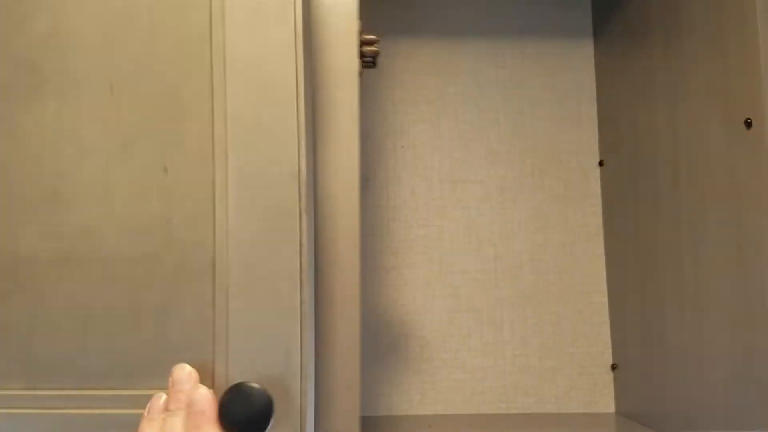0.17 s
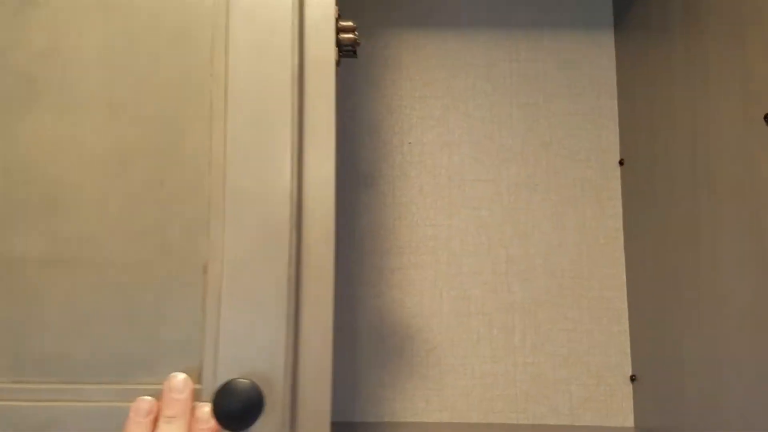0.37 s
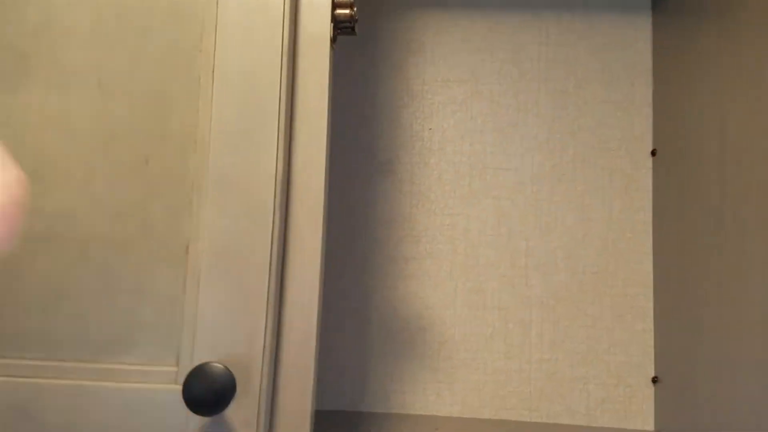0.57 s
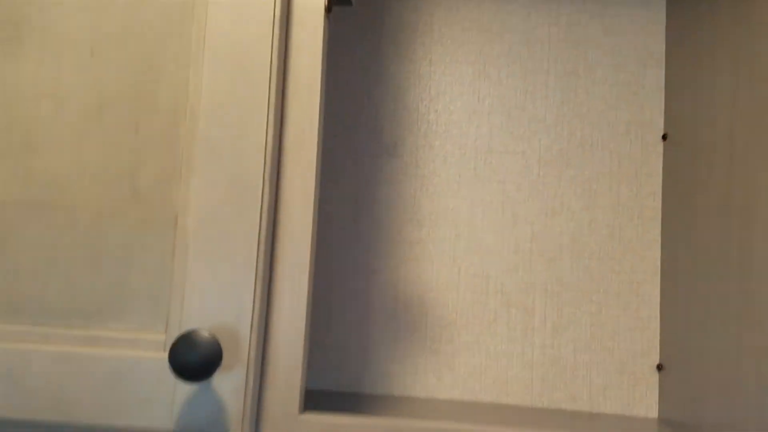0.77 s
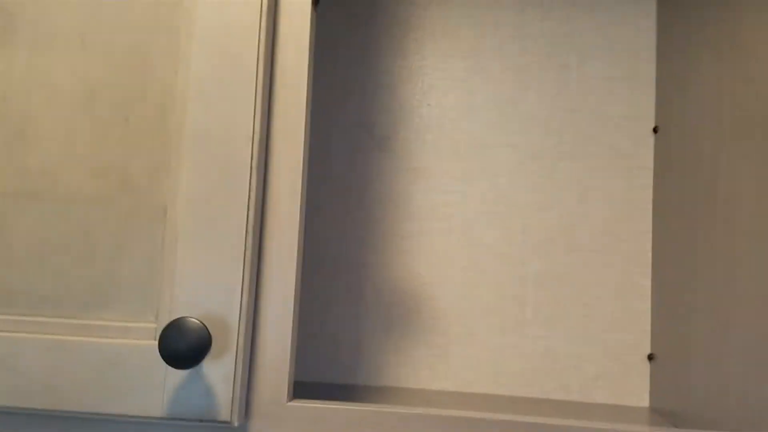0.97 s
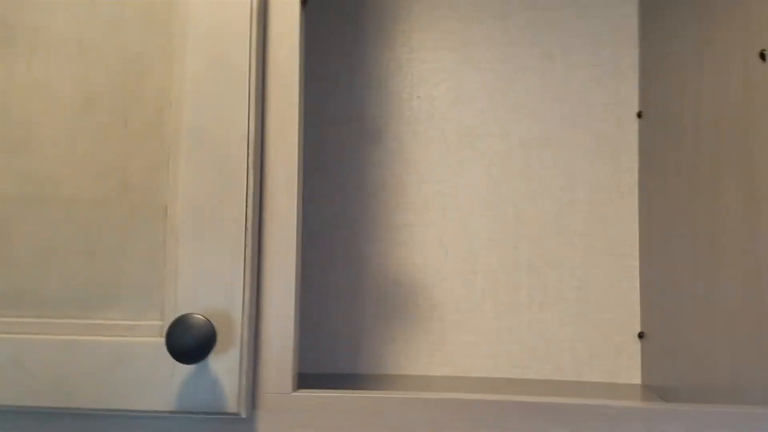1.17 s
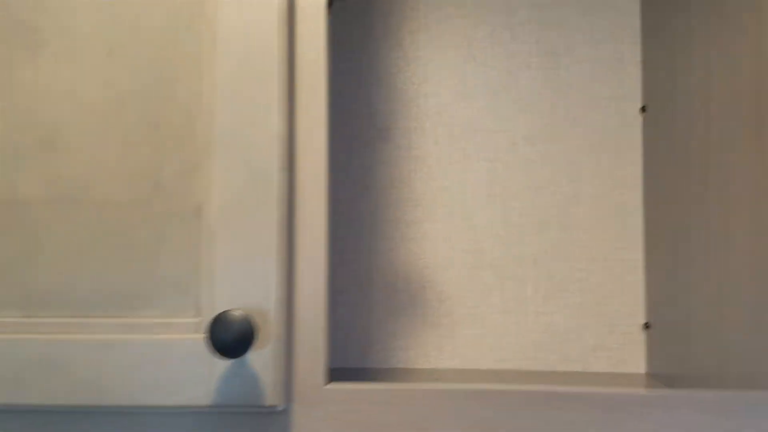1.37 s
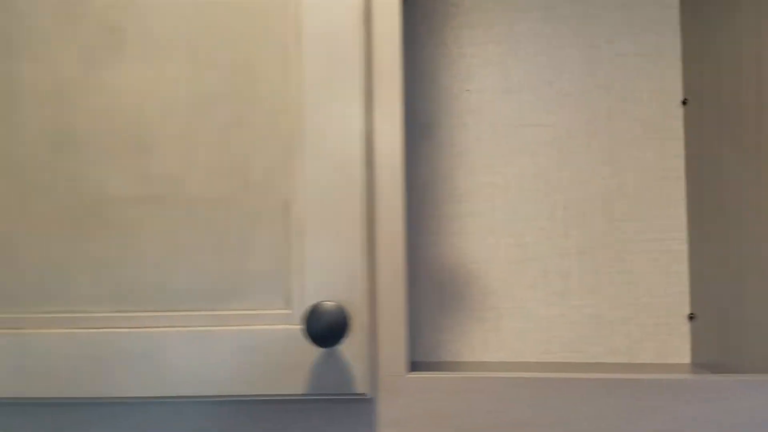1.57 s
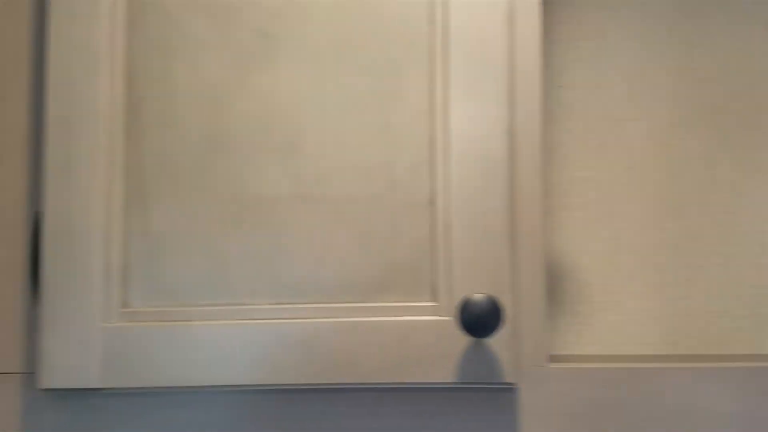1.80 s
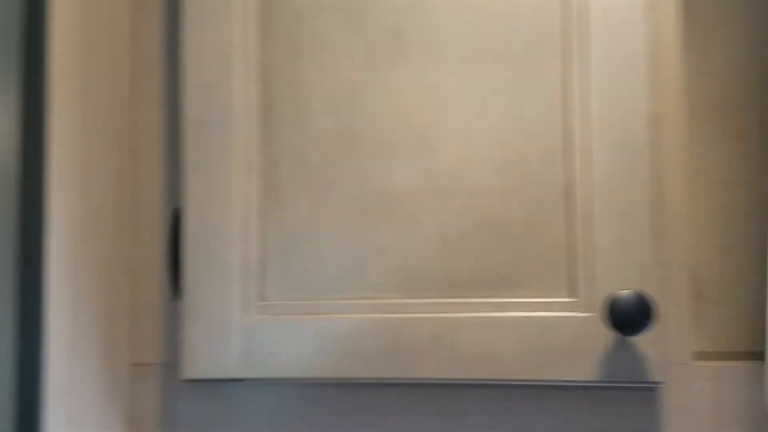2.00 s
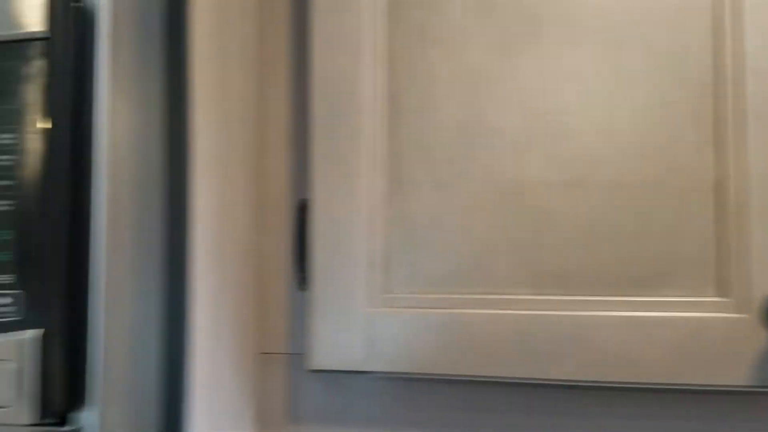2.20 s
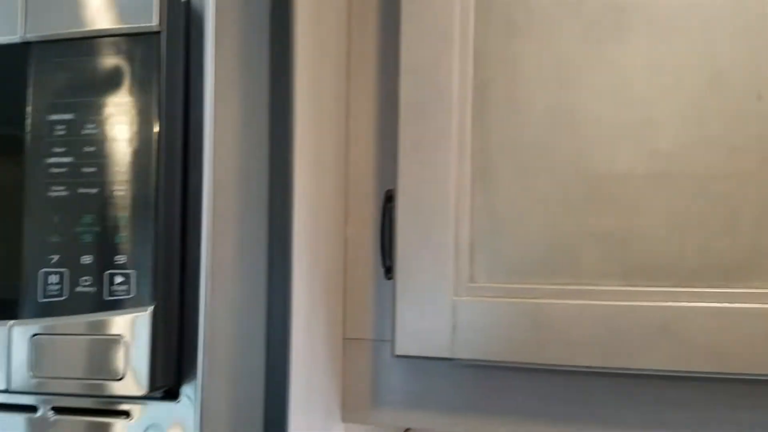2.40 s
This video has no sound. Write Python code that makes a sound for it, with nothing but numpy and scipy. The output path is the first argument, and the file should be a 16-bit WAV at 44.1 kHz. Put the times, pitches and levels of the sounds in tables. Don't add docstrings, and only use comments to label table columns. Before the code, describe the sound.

A cupboard door bangs shut with a quick rattling bounce, handling clicks and rubs follow close to the stereo phone microphone, then a second door clacks closed with more catch and room tail over faint cabin hum.

```python
import sys
import numpy as np
from scipy import signal
from scipy.fft import rfft, irfft, next_fast_len
from scipy.io import wavfile
from scipy.ndimage import uniform_filter1d

SR = 44100
rng = np.random.default_rng(int(sys.argv[2]) if len(sys.argv) > 2 else 0)


def wrap_up_sound(samples):
    columns = np.atleast_2d(samples).T
    tamed = np.clip(columns, -1, 1)
    steps = np.round(tamed * 32767).astype(np.int16)
    wavfile.write(sys.argv[1], SR, steps)


def gain_from_db(level_db):
    decades = np.asarray(level_db, float) / 20
    return 10 ** decades


N = 108045

# frequency in Hz, likeness from 0 to 1.
DOOR_LIKENESS = [(60, 1), (250, 0.97), (700, 0.8), (2000, 0.58), (12000, 0.22)]


def evened(x):
    return x / np.sqrt(np.mean(x ** 2) + 1e-20)


def read(points, hz):
    f, value = np.transpose(points)
    return np.interp(np.log(hz + 1), np.log(f + 1), value)


def add(mix, s, sound):
    part = mix[..., round(s * SR):][..., :sound.shape[-1]]
    part += sound[..., :part.shape[-1]]


def coloured(x, gain):
    size = next_fast_len(x.shape[-1] + 2048)
    spectrum = rfft(x, size) * gain(np.fft.rfftfreq(size, 1 / SR))
    return irfft(spectrum, size)[..., :x.shape[-1]]


def resonance(hz, centre_hz, width_hz):
    return 1 / (1 + (2 * (hz - centre_hz) / width_hz) ** 2)


def slow_drift(rows, size):
    noise = uniform_filter1d(rng.standard_normal((rows, N)), size=size)
    return evened(uniform_filter1d(noise, size=size))


def panned(db, pan_db):
    return gain_from_db(db + np.array([[pan_db / 2], [-pan_db / 2]]))


def advanced(x, lag_ms):
    return coloured(x, lambda hz: np.exp(2j * np.pi * hz * lag_ms / 1000))


def earlier(pair, lag_ms):
    return np.array([pair[0], advanced(pair[1], lag_ms)])


def hum():
    # frequency in Hz, level in dB per Hz.
    floor = [(25, 1.5), (80, -1.5), (125, -13), (250, -11), (340, -6.5), (2200, -19.5), (4500, -30.5),
             (8000, -47.5)]
    # frequency in Hz, width in Hz, lift in dB.
    bands = [(350, 99, 3.5), (895, 250, 4.5), (1362, 235, 5.5), (1900, 440, 4)]
    # frequency in Hz, likeness of the two ports from 0 to 1.
    likeness = [(60, 0.74), (240, 1), (900, 0.15), (4000, 0.13)]
    # time in seconds, level in dB.
    swells = [(0, 2), (.4, 2), (0.651, -3), (.9, 1), (1.33, -2.5), (2.45, -0.5)]
    level_db, lag_ms = -48, 0.4

    frames, hz = N // 256 + 5, np.fft.rfftfreq(2048, 1 / SR)
    a, b, c, d, patches = rng.standard_normal((frames, len(hz), 5)).T
    patches = uniform_filter1d(patches, size=8, axis=0)
    patches = evened(uniform_filter1d(patches, size=14, axis=1))
    lift = sum(db / (1 + (2 * (hz - f) / w) ** 4) for f, w, db in bands)[:, None]
    same = np.clip(read(likeness, hz), -1, 1)[:, None]
    left = a + 1j * b
    right = same * left + np.sqrt(1 - same ** 2) * (c + 1j * d)
    colour = gain_from_db(read(floor, hz)[:, None] + lift + (1.2 + .25 * lift) * patches)
    spectrum = np.array([left, right]) * colour
    x = evened(signal.istft(spectrum, nperseg=2048, noverlap=2048 - 256)[1][:, :N])
    x = x * gain_from_db(level_db + np.interp(np.arange(N) / SR, *np.transpose(swells)))
    return earlier(x, lag_ms)


def drone():
    motor_hz, wander_hz, level_db, swing_db = 79.1, 3.2, -57.5, 2.2
    swing, wander = slow_drift(2, 3000)
    phase = 2 * np.pi * np.cumsum(motor_hz + wander_hz * wander) / SR
    return gain_from_db(level_db + swing_db * swing) * np.sqrt(2) * np.sin(phase)


def ticks():
    # time in seconds, peak in dB, ring in Hz, pan in dB, dry snap in dB.
    taps = [(.062, -35, 2300, 4, -32), (.972, -48, 4000, -10, -25), (.976, -50, 5800, -10, -25),
            (1.049, -36, 2300, -10, -24), (1.892, -47, 4000, 6, -8), (0.777, -34, 3850, 23, -15.5),
            (.851, -26.5, 1110, 10, -19), (0.997, -37.5, 2650, -14, -9), (1.012, -37.5, 2920, -17, -2.5),
            (1.022, -23.5, 1300, 3, -26), (1.028, -36, 2400, -28, -24), (1.032, -31, 910, -10, -9),
            (1.036, -33, 2630, -1, -18), (1.042, -23, 2950, -9, -18), (1.055, -20, 2300, -15.5, -15.5),
            (1.232, -35.5, 920, -4, -30), (1.074, -53, 9000, -12, -4), (1.983, -25.5, 1340, -9, -21),
            (2.049, -36.5, 2980, 26.5, -20)]
    cycles, snap_t60_s = 1.55, .003
    out, t = np.zeros((2, N)), np.arange(400) / SR
    for s, db, hz, pan, snap_db in taps:
        u = t * hz / cycles
        tick = np.e * 3 * u * np.exp(-3 * u) * np.sin(2 * np.pi * hz * t)
        snap = gain_from_db(snap_db - 60 * t / snap_t60_s) * rng.standard_normal((2, 400))
        add(out, s - .0005, panned(db, pan) * (tick + snap))
    return out


def stroke(length, hz, octaves, top_hz):
    rise, grit_db = 0.13, 1.5
    u = np.arange(9000) / SR / length
    grit = rng.standard_normal((3, 9000)) * gain_from_db(grit_db * np.minimum(rng.exponential(1, 9000), 4))

    def band(f):
        return np.exp(-.5 * (np.log2((f + 1) / hz) / octaves) ** 2) / (1 + (f / top_hz) ** 6)

    grit = evened(coloured(grit[:2] + grit[2], band))
    return grit * np.minimum(u / rise, 1) * np.exp(-3.5 * np.maximum(u - rise, 0) ** 1.3)


def rubs():
    # start in seconds, length in seconds, level in dB, centre in Hz, pan in dB.
    slides = [
        (0.773, 0.1, -50.5, 3200, 24.5),
        (0.848, 0.025, -50.5, 2920, 25),
        (0.963, 0.093, -62, 2960, 18),
        (1.013, 0.037, -43.5, 1120, 17),
        (1.224, 0.085, -46, 455, 7),
        (1.912, 0.05, -45.5, 610, 5),
        (1.979, 0.069, -35.5, 626, 5.5),
        (2.017, 0.16, -44.5, 1070, 2),
        (.062, 0.048, -44.5, 830, -2),
    ]
    rustles = [
        (1.531, .04, -47, 1500, 7),
        (1.546, .08, -46, 2600, 3),
        (1.548, .018, -59, 11000, 0),
        (.778, .06, -63, 11500, 15),
        (1.735, .03, -61, 3500, 0),
    ]
    out = np.zeros((2, N))
    for s, length, db, hz, pan in slides:
        add(out, s, panned(db, pan) * stroke(length, hz, 1.23, 7540))
    for s, length, db, hz, pan in rustles:
        add(out, s, panned(db + 1.1, pan) * stroke(length, hz, 0.63, SR))
    return out


def bumps():
    # time in seconds, level in dB, frequency in Hz, swell in seconds.
    pushes = [(.728, -34.5, 81, 0.0072), (1.045, -40.5, 150, 0.0074), (1.256, -45, 166, 0.0079),
              (2.04, -39.5, 243, 0.0055), (0.062, -28, 70.4, 0.0071), (0.778, -28.5, 66, 0.0087),
              (1.2, -40.5, 72.4, 0.04), (1.229, -36.5, 340, 0.0031), (1.434, -34, 144, 0.025),
              (1.44, -42, 305, 0.0097), (1.982, -29, 427, 0.0019), (1.978, -34.5, 67, 0.0065),
              (2.018, -31, 60, .02)]
    out, t = np.zeros((2, N)), np.arange(9000) / SR
    for s, db, hz, swell in pushes:
        envelope = (t / swell * np.exp(1 - t / swell)) ** 2
        add(out, s, -gain_from_db(db) * envelope * np.sin(2 * np.pi * hz * t))
    return out


def hand():
    return earlier(ticks() + rubs() + bumps(), 0.408)


def hinge():
    # start in seconds, length in seconds, level in dB, frequency in Hz, width in Hz.
    whines = [
        (.07, .12, -47, 1346, 290),
        (.42, .14, -57, 1420, 220),
        (.89, .05, -55, 1360, 120),
        (1.63, .07, -54, 1350, 100),
        (1.72, .12, -53, 1370, 130),
        (1.57, .06, -54, 370, 60),
        (1.76, .1, -57, 560, 80),
        (2.24, .1, -52, 1400, 700),
    ]
    out = np.zeros((2, N))
    for s, length, db, centre_hz, width_hz in whines:
        grit = rng.standard_normal((2, 9000)) * rng.exponential(1, 9000)
        whine = evened(coloured(grit + grit[0], lambda hz: resonance(hz, centre_hz, width_hz)))
        arch = np.sin(np.pi * np.clip(np.arange(9000) / SR / length, 0, 1))
        add(out, s, gain_from_db(db - 0.7) * np.sqrt(arch.clip(0)) * whine)
    return out


def ports(one, other, lag_ms, lean_db):
    def like(hz):
        return np.clip(read(DOOR_LIKENESS, hz), 0, 1)

    shared = advanced(coloured(one, like), lag_ms)
    right = shared + coloured(other, lambda hz: np.sqrt(1 - like(hz) ** 2))
    return np.array([one * gain_from_db(lean_db / 2), right * gain_from_db(-lean_db / 2)])


def ring(modes, length, s):
    rise_s, scatter_rad, scatter_db = .0008, 1.4, 2.85
    t = np.arange(round(length * SR)) / SR
    luck = rng.uniform(-0.93, 1, (len(modes), 2))
    out = np.zeros(len(t))
    for (u, v), (hz, db, t60) in zip(luck, modes):
        decay = gain_from_db(db + scatter_db * u - 60 * t / max(t60, .004))
        out += decay * np.sin(2 * np.pi * hz * (t + s) + scatter_rad * v)
    return np.minimum(t / rise_s, 1) * out


def cabin():
    # frequency in Hz, t60 in seconds.
    tail_t60 = [(60, 0.31), (250, 0.44), (1000, 0.28), (4000, 0.26), (12000, 0.18)]
    hz, t, z = signal.stft(rng.standard_normal((2, SR // 2)), SR, nperseg=256)
    tail = signal.istft(z * gain_from_db(-60 * t / read(tail_t60, hz)[:, None]), SR, nperseg=256)[1]
    tail = tail * np.minimum(np.arange(tail.shape[1]) / (0.0045 * SR), 1)
    return tail / np.linalg.norm(tail[0])


def door(hits, panel, colour, seated_s, catch_db, tail_db, lag_ms, lean_db):
    # frequency in Hz, level in dB, t60 in seconds.
    steel = [(2414, 6.5, 0.0098), (4193, 7, .011), (5430, -6, 0.014), (7930, -16.5, 0.01)]
    crack_t60_s, crack_rise_s, click_t60_s, click_low_hz = .042, .0015, 0.015, 3500
    body, crack, catch, click = np.zeros((4, N))
    t = np.arange(4000) / SR
    crack_shape = np.minimum(t / crack_rise_s, 1) * gain_from_db(-60 * t / crack_t60_s)
    for s, blow_db, crack_db, click_db in hits:
        edge = coloured(rng.standard_normal(4000), lambda hz: 1 / (1 + (click_low_hz / (hz + 1)) ** 4))
        add(click, s, gain_from_db(click_db - 60 * t / click_t60_s) * evened(edge))
        add(body, s, gain_from_db(blow_db) * ring(panel, 0.33, s - hits[0][0]))
        burst = coloured(rng.standard_normal(4000), lambda hz: gain_from_db(read(colour, hz)) * (hz > 250))
        add(crack, s, gain_from_db(crack_db) * evened(burst) * crack_shape)
        add(catch, s, gain_from_db(crack_db + catch_db) * ring(steel, 4000 / SR, 0))
    body = body * gain_from_db(-np.clip((np.arange(N) / SR - seated_s) * 400.5, 0, 11.5))
    sent = gain_from_db(tail_db) * crack + gain_from_db(-13) * body + gain_from_db(-14.5) * catch + gain_from_db(-3) * click
    wet = signal.fftconvolve(sent[None], cabin(), axes=1)[:, :N]
    near = body + crack + catch + click
    return ports(near + wet[0], np.roll(near, 150) + wet[1], lag_ms, lean_db)


def first_door():
    # time in seconds, panel blow in dB, crack in dB, click in dB.
    hits = [
        (.2295, -22, -9, -36),
        (.233, -11.5, -22, -45),
        (.2483, -7.5, -10, -25),
        (.267, -9.5, -21, -35),
        (.285, -14.5, -23, -41),
        (.303, -23.5, -34, -59.5),
        (.311, -20, -37.5, -59.5),
        (.328, -28.5, -42, -64),
    ]
    # frequency in Hz, level in dB, t60 in seconds.
    panel = [(98, 1.5, 0.084), (117.5, -5, 0.19), (178, -4, .2), (228.3, -7.5, 0.31), (298.6, -5.5, 0.089),
             (384.6, -15, .25), (516, -11, 0.12), (656, -10.5, 0.089), (752, -17, 0.11), (808, -14.5, 0.12),
             (870.7, -11, 0.082), (1088, -18.5, 0.058), (1137, -21.5, 0.073), (1715, -15.5, .05)]
    # frequency in Hz, level in dB per Hz.
    colour = [(250, -7.5), (800, -8), (2300, -11), (4200, -22.5), (6500, -40), (9000, -59), (12000, -43),
              (16000, -50)]
    return door(hits, panel, colour, seated_s=0.329, catch_db=-14, tail_db=-2, lag_ms=-0.16, lean_db=-1)


def shudder():
    # time in seconds, level in dB, t60 in seconds, upper modes in dB.
    shuts = [
        (0.234, -27.5, 1.35, -0.5),
        (2.102, -30, 0.84, -7),
    ]
    # frequency in Hz, level in dB, wander in Hz.
    wall = [(56.3, 2, 4), (88, -2, 7.9), (150, -11.5, 10)]
    t, out = np.arange(N) / SR, np.zeros(N)
    modes = []
    for d, (hz, db, wander) in zip(slow_drift(len(wall), 2000), wall):
        phase = 2 * np.pi * np.cumsum(hz + wander * d) / SR
        modes.append(gain_from_db(db) * np.sqrt(2) * np.sin(phase))
    low, *upper = modes
    rattle = evened(coloured(rng.standard_normal(N), lambda hz: resonance(hz, 200, 180)))
    upper = sum(upper) + gain_from_db(-6) * rattle
    for s, db, t60, upper_db in shuts:
        decay = np.clip((t - s) / 0.014, 0, 1) * gain_from_db(db - 60 * np.abs(t - s) / t60)
        out += (low + gain_from_db(upper_db) * upper) * decay
    return out


def second_door():
    # time in seconds, panel blow in dB, crack in dB, click in dB.
    hits = [
        (2.0885, -19, -12.5, -28),
        (2.1065, -30, -26, -30),
        (2.109, -17, -22, -40),
        (2.113, -16.5, -15.5, -31),
        (2.120, -17, -17.5, -43),
        (2.144, -14, -23.5, -41),
        (2.154, -16.5, -48, -55),
    ]
    # frequency in Hz, level in dB, t60 in seconds.
    panel = [(137.3, 0.5, 0.073), (212.1, -10.5, .14), (330.3, 0, 0.13), (360.3, -2, 0.13), (413, 0, 0.098),
             (455.3, -13, 0.15), (544, -3.5, .08), (590.5, -3.5, 0.077), (638.4, -5.5, 0.1),
             (737, -15, 0.17), (821, -14.5, 0.11), (964, -6.5, .14), (1128, -14.5, .11), (1300, -5, 0.09)]
    # frequency in Hz, level in dB per Hz.
    colour = [(250, -11.5), (800, -1), (2000, -6.5), (4200, -18.5), (6500, -29.5), (9000, -42),
              (12000, -43), (16000, -36)]
    return door(hits, panel, colour, seated_s=2.166, catch_db=-2, tail_db=4, lag_ms=0.18, lean_db=0.7)


def scene():
    return hum() + drone() + hand() + hinge() + first_door() + shudder() + second_door()


def top_cut(x):
    return signal.sosfilt(signal.butter(12, 16940, fs=SR, output="sos"), x)


def record(dry):
    # frequency in Hz, level in dB.
    hiss_colour = [(4000, -16), (8000, -17), (11000, -14), (15000, -6)]
    limit_db, squeeze, recover_db_per_s = -9, 0.086, 177
    low_hz, edge_hz, hiss_db = 41.7, 15900, -72.5

    power_db = 10 * np.log10(abs(uniform_filter1d((dry ** 2).mean(0), size=200)) + 1e-12)
    fall = np.arange(N) * recover_db_per_s / SR
    held_peak_db = np.maximum.accumulate(power_db + fall) - fall
    over_db = np.maximum(held_peak_db - limit_db, 0)
    held = dry / gain_from_db(squeeze * uniform_filter1d(over_db, size=100))

    def hiss_gain(hz):
        return gain_from_db(read(hiss_colour, hz)) * (hz > 2000) * (hz < edge_hz)

    held = held + gain_from_db(hiss_db) * evened(coloured(rng.standard_normal((2, N)), hiss_gain))
    held = coloured(held, lambda hz: hz ** 2 / (hz ** 2 + low_hz ** 2) / (1 + (hz / edge_hz) ** 120))
    return top_cut(np.clip(held, -1, 1))


dry = scene()
out = record(dry)
wrap_up_sound(out)
```